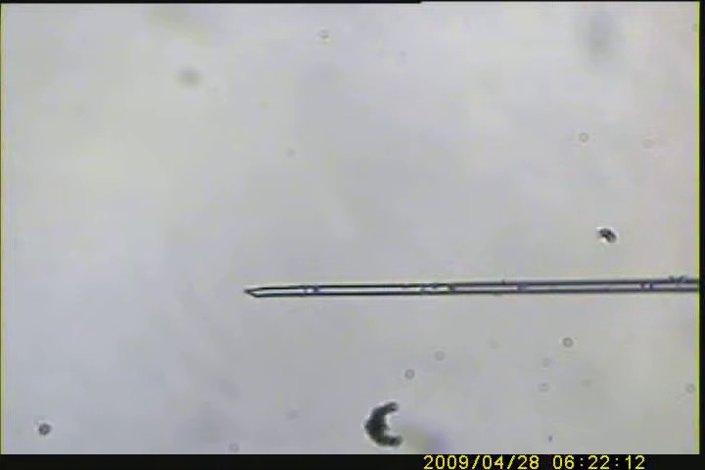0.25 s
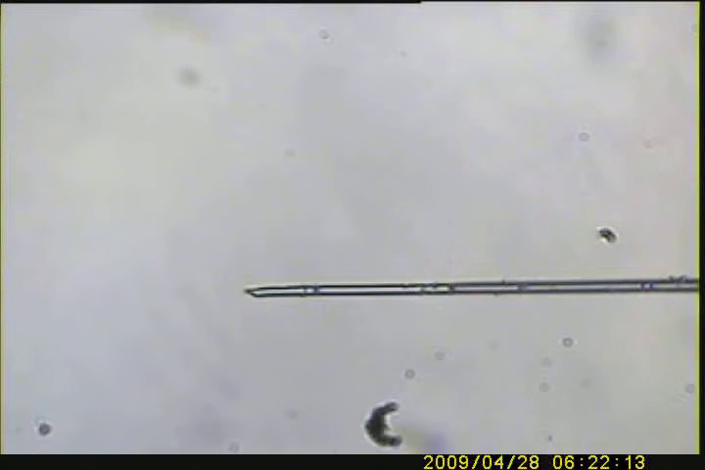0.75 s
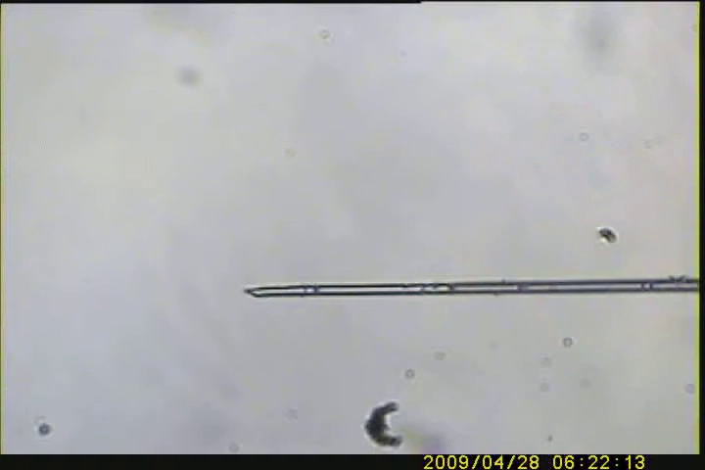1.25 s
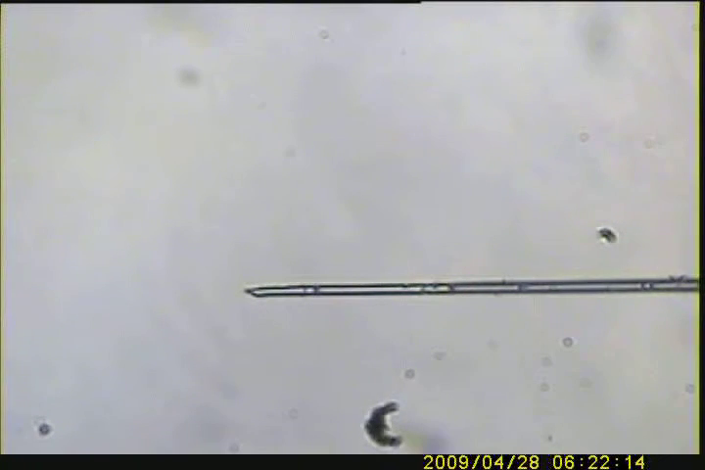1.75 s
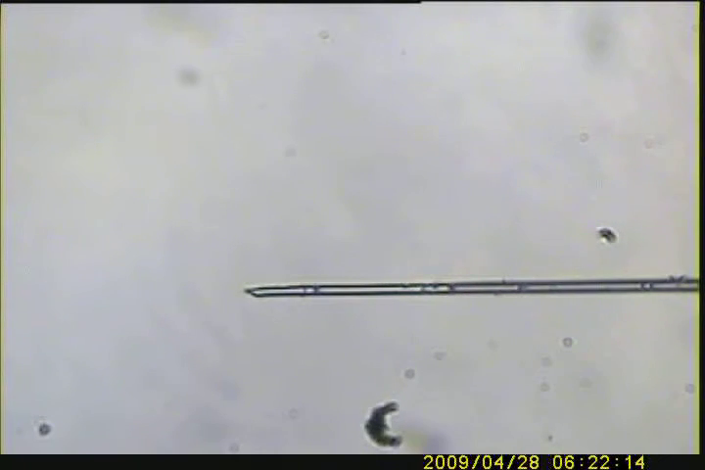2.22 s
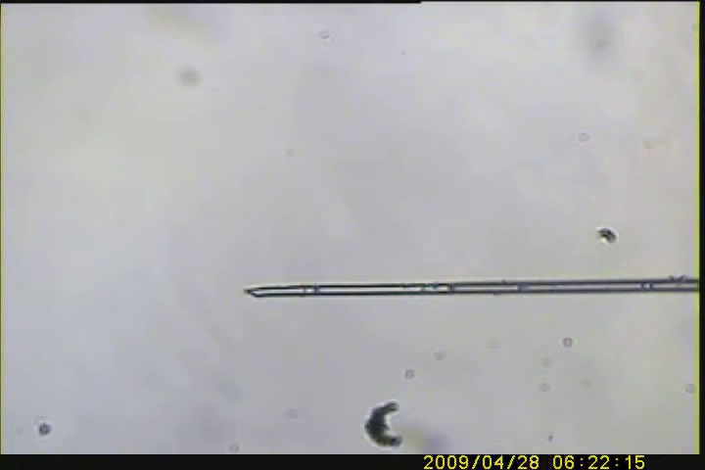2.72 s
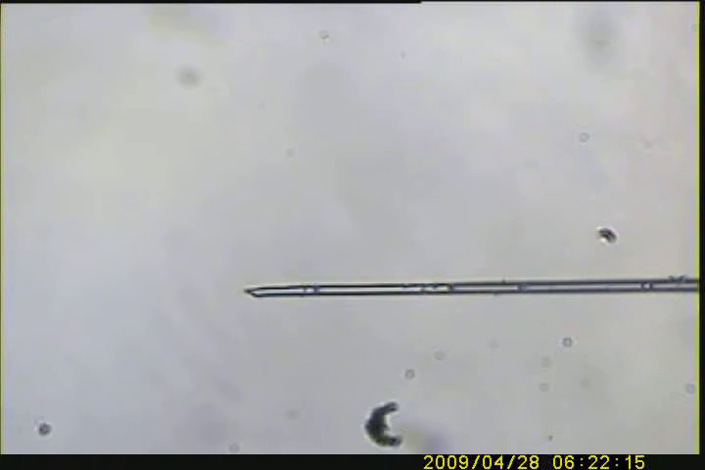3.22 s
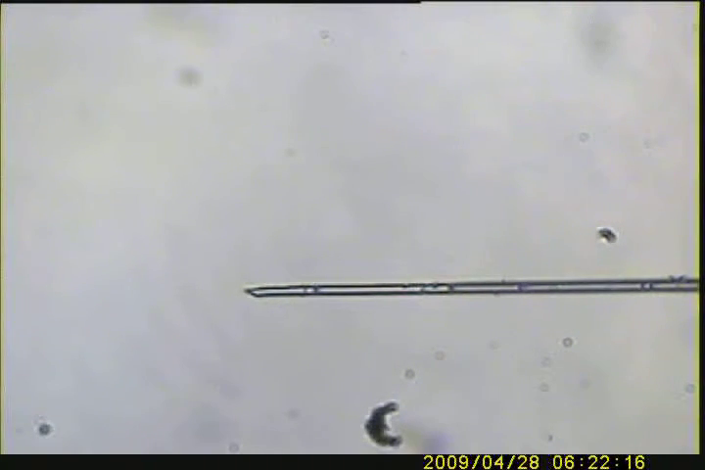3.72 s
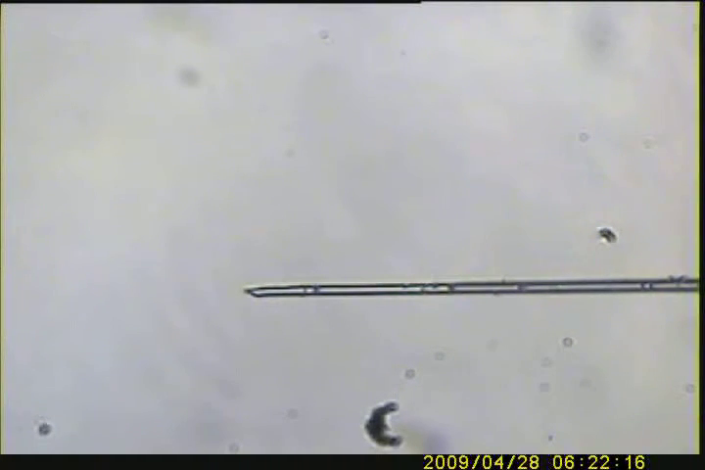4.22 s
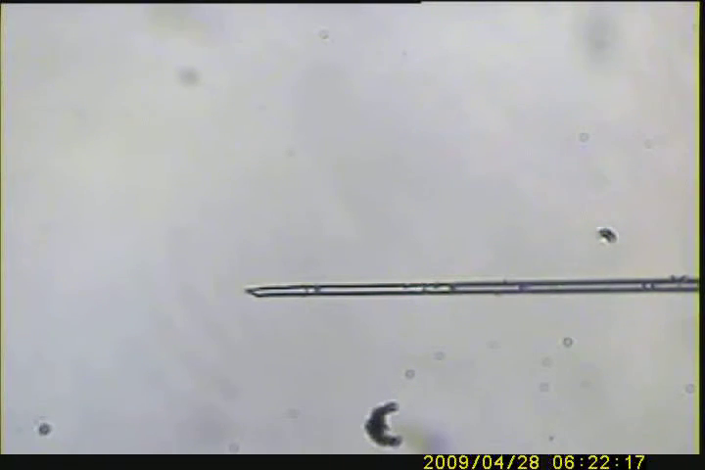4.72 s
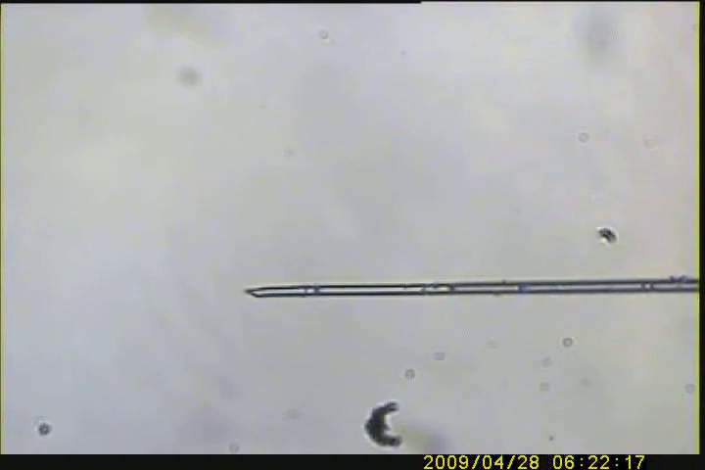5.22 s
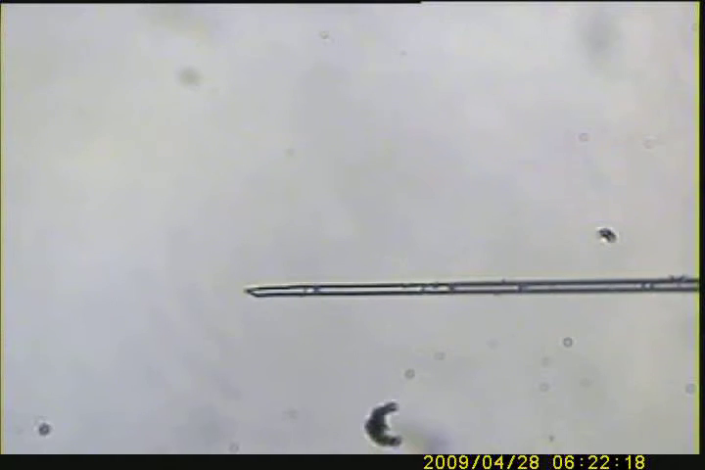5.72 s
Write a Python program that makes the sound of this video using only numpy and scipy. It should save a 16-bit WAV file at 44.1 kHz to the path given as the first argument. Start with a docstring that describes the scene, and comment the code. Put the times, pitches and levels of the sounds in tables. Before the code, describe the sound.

An idle electronic input whines continuously around 8 kHz, thin and roughened by fast, ragged beating. Softer steady hiss sits behind it, with a barely audible low burble. Every third of a second or so the beating stalls for an instant. No room, no microphone pickup; the needle-like probe and specks under magnification make no sound.

```python
"""A thin whistle beats around 8 kHz: an idle sound converter makes it with nothing playing into its input.
A swinging wave multiplies a fixed carrier; picture-frame crosstalk and random drift bend its speed,
and short stalls slow it. Squaring the same swing puts a faint burble in the bass.
Behind them lie steady circuit hiss, made of filtered noise, and a very faint sine tone."""
import sys
import numpy as np
from scipy import signal
from scipy.fft import rfft, irfft
from scipy.io import wavfile

SR = 44100
rng = np.random.default_rng(int(sys.argv[2]) if len(sys.argv) > 2 else 0)


def inscribe(sig):
    """Save sig as 16-bit PCM at rate SR to the path in sys.argv[1].

    A 1-D sig is mono; a 2-D sig holds one channel per row.
    Samples are clipped to [-1, 1] before scaling.
    """
    pcm = np.round(np.clip(np.atleast_2d(sig).T, -1, 1) * 32767)
    wavfile.write(sys.argv[1], SR, pcm.astype(np.int16))


N = 262395
TIME = np.arange(N) / SR  # seconds

# Crosstalk slows the beat three times in each picture frame; depth varies around the value given.
# Columns: place_frames (0-1), width_frames (0-1), depth_hz
FRAME_DIPS = [(.145, 0.02, 214.4), (.625, .062, 245), (0.814, 0.03, 160)]
# Long stalls of the beat, each with a soft bump in the bass; the bump is relative to the plain burble.
# Columns: centre_s, length_s, bump_db
LONG_STALLS = [(.237, .042, 5), (.836, .03, 9.5), (1.74, .044, 9), (2.64, .03, 10), (3.807, .045, 9.5),
               (4.481, .034, 9.5)]
# Tone colour of the burble, before its overall level is set. Columns: pitch_hz, relative_db
BURBLE_COLOUR = [(15, -18.5), (50, -8), (150, -6.0), (300, -2.5), (450, -2), (700, 0.0), (1500, -7.0)]
# Tone colour of the circuit hiss, before its overall level is set. Columns: pitch_hz, relative_db
HISS_COLOUR = [(20, 7.5), (60, 4.5), (150, 4), (300, 3.5), (600, 1.5), (1200, -0.5), (2600, -0.5),
               (4000, -1.1), (5500, -0.5), (6800, 0.5), (7600, 2), (8300, 4)]
# Steep upper end of the hiss. Columns: pitch_hz, relative_db
HISS_TOP = [(9500, -23.5), (12000, -60.5)]
# Uneven slope of the converter's low-pass filter. Columns: pitch_hz, gain_db
ROLL_OFF = [(7000, 0.5), (7500, 4.5), (7800, -2), (8000, -3), (8200, -8), (8400, -8.5), (8600, -10.5),
            (8750, -29)]

CARRIER_HZ, BEAT_HZ, FRAME_HZ = 8000, 213.3, 29.97
# A loose train of short stalls
FIRST_STALL_S, STALL_EVERY_S, STALL_SCATTER_S = .24, .3, .015
STALL_LENGTH_S, STALL_BEAT_HZ, LONG_STALL_BEAT_HZ = .028, 51.98, 44.01
TONE_HZ, TONE_DB = 1240, -83.5  # level before the converter's filter
TOP_HZ, OUTPUT_OFFSET = 8760, .0318  # offset as a share of full scale


def whistle(swing, db=-39.0):
    """The swing multiplies a fixed carrier, giving mirrored whistles just under and over it."""
    carrier = np.cos(2 * np.pi * CARRIER_HZ * TIME)
    return level(swing * carrier, db)


def beat(pauses, squareness=.75, fuzz_rad=0.12, flutter=0.058):
    """A slightly flat-topped swing at the beat rate, with ragged timing and fluttering strength."""
    phase = 2 * np.pi * np.cumsum(beat_rate(pauses)) / SR
    phase = phase + fuzz_rad * wander(1300)
    swing = level(np.tanh(squareness * np.cos(phase)), 0)
    return swing * (1 + flutter * wander(790))


def beat_rate(pauses, drift_hz=17, jitter_hz=40, dip_scatter=0.2801, stall_jitter_hz=50, rebound_hz=20):
    """The beat follows the tiny input voltage: crosstalk, drift and noise; it rebounds after a stall."""
    rate = BEAT_HZ + drift_hz * wander(24.93) + jitter_hz * wander(349.3)
    crosstalk = 1 + dip_scatter * wander(59.9)  # varies the depth of the dips
    for place, width, depth_hz in FRAME_DIPS:
        # distance from the nearest dip, in frames
        away = (TIME * FRAME_HZ - place + .5) % 1 - .5
        dip = np.exp(-.5 * (away / width) ** 2)
        rate = rate - depth_hz * crosstalk * dip
    unrest = stall_jitter_hz * wander(200.4)
    for centre, length, slow_hz, _ in pauses:
        rate = rate + rebound_hz * bump(centre + 2 * length, 2 * length)
        # inside the stall, fade over to the slow, restless rate
        rate = rate + bump(centre, length) * (slow_hz + unrest - rate)
    return rate


def stalls(bump_db=4):
    """Rows of centre_s, length_s, beat_hz, bump_db; a long stall replaces a short one due nearby."""
    rows = [(centre, length, LONG_STALL_BEAT_HZ, db) for centre, length, db in LONG_STALLS]
    for k, late in enumerate(rng.standard_normal(size=20)):
        due = FIRST_STALL_S + k * STALL_EVERY_S
        if all(abs(due - centre) > STALL_EVERY_S / 2 for centre, _, _ in LONG_STALLS):
            rows.append((due + STALL_SCATTER_S * late, STALL_LENGTH_S, STALL_BEAT_HZ, bump_db))
    return rows


def bump(centre, length):
    """Flat-topped window, 1 at its centre."""
    return np.exp(-np.square((2 * (TIME - centre) / length) ** 2))


def burble(swing, pauses, db=-61):
    """Squaring folds the whistle pair down to twice the beat rate; in a stall it swells to a bump."""
    folded = swing ** 2 - np.mean(swing ** 2)
    folded = colour(folded, BURBLE_COLOUR)
    stalled = sum(undb(bump_db) * bump(centre, length) for centre, length, _, bump_db in pauses)
    bass_bumps = lowpass(folded * stalled, 110)
    return level(folded + bass_bumps, db)


def hiss(db=-52.5):
    """Steady amplifier noise, filtered so that it rises towards the bass and again near 8 kHz."""
    noise = rng.standard_normal(N)
    return level(colour(noise, HISS_COLOUR + HISS_TOP), db)


def faint_tone():
    """Interference heard as one steady sine wave."""
    return level(np.sin(2 * np.pi * TONE_HZ * TIME), TONE_DB)


def undb(db):
    """Decibels to gain."""
    return 10 ** (np.asarray(db) / 20)


def level(x, db):
    """Scale to an rms (average power) level."""
    return x * undb(db) / np.sqrt(np.mean(x ** 2))


def colour(x, points):
    """Filter by pitch_hz, gain_db points joined on a log-frequency axis."""
    hz, db = np.transpose(points)
    bins = np.maximum(np.arange(N // 2 + 1) * SR / N, 1)  # Hz, kept above zero for the log
    gain = undb(np.interp(np.log(bins), np.log(hz), db))
    return irfft(rfft(x) * gain, N)


def lowpass(x, hz, order=2):
    """Smooth low-pass: keeps what lies below hz."""
    return signal.sosfilt(signal.butter(order, min(hz, SR / 2 - 1), fs=SR, output="sos"), x)


def wander(hz):
    """Random motion up to about a given rate, with an rms size of 1."""
    return level(lowpass(rng.standard_normal(N), hz), 0)


def scene():
    """Whistle, burble, hiss and a faint tone on one line."""
    pauses = stalls()
    swing = beat(pauses)  # shared by whistle and burble
    return (whistle(swing) + burble(swing, pauses) + hiss() + faint_tone())[None]


def record(dry):
    """The converter's filter weakens the upper whistle and cuts the top; its output rests off zero."""
    sloped = colour(dry[0], ROLL_OFF)
    # 0.1 dB ripple below the cut, 80 dB down above it
    steep_cut = signal.ellip(10, .1, 80, TOP_HZ, fs=SR, output="sos")
    return signal.sosfilt(steep_cut, sloped)[None] + OUTPUT_OFFSET


dry = scene()
out = record(dry)
inscribe(out)
```